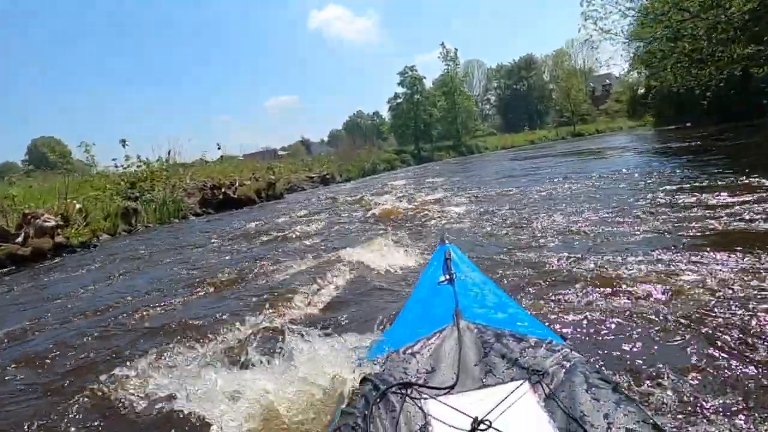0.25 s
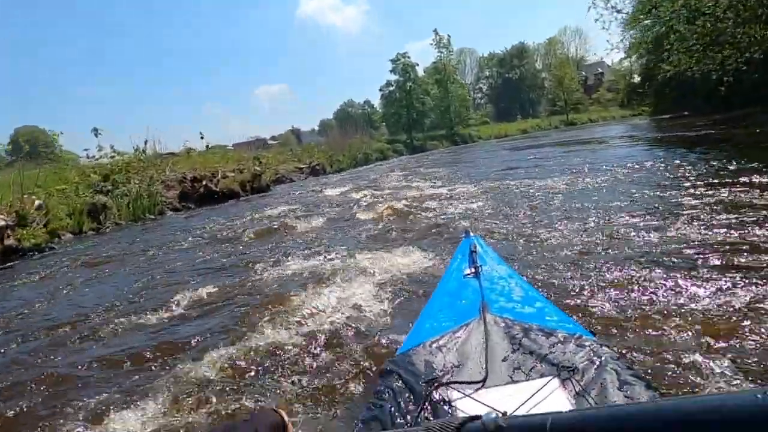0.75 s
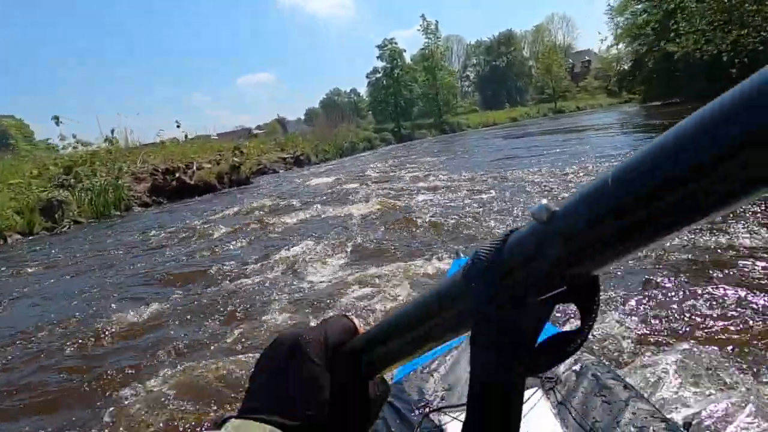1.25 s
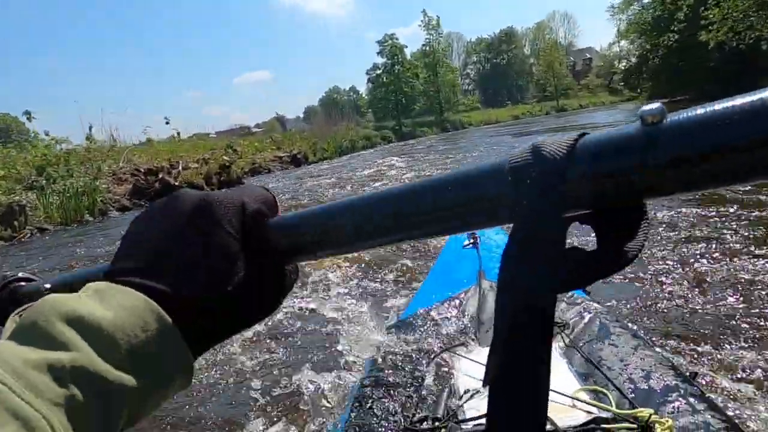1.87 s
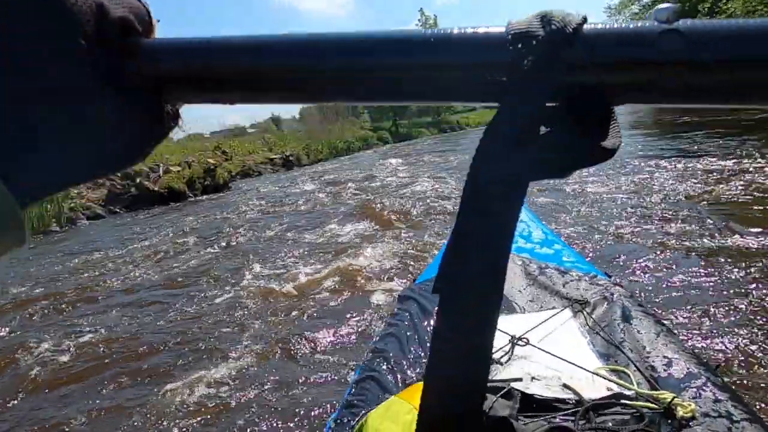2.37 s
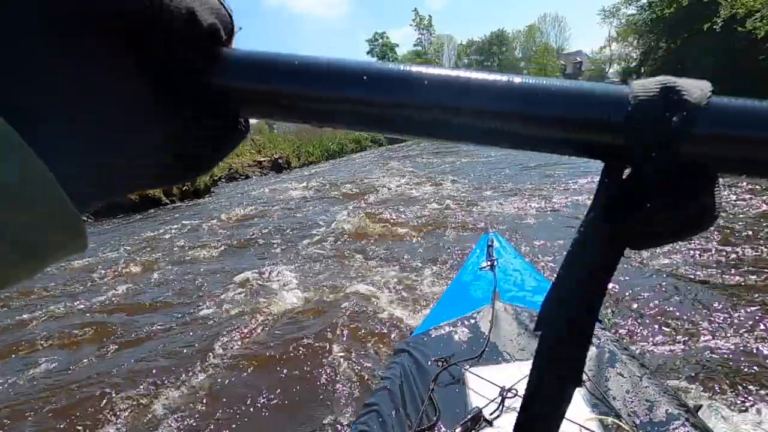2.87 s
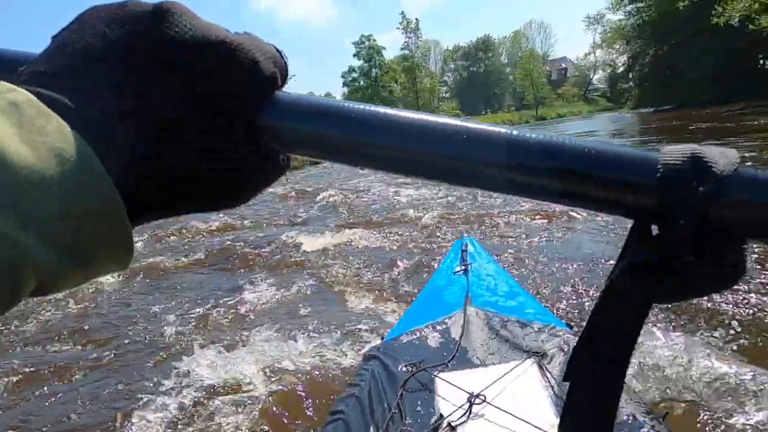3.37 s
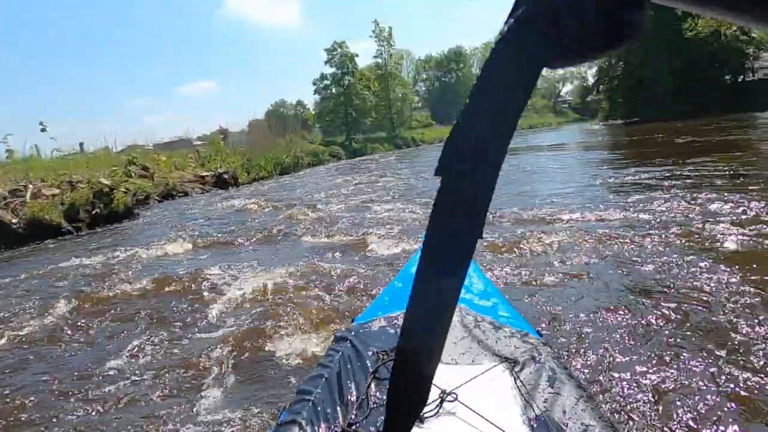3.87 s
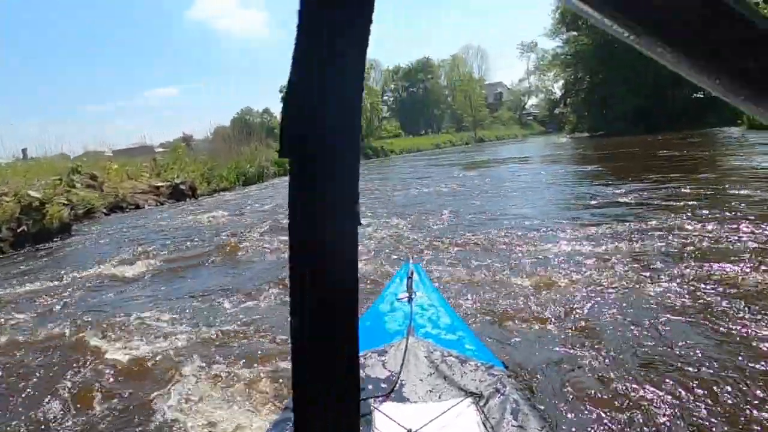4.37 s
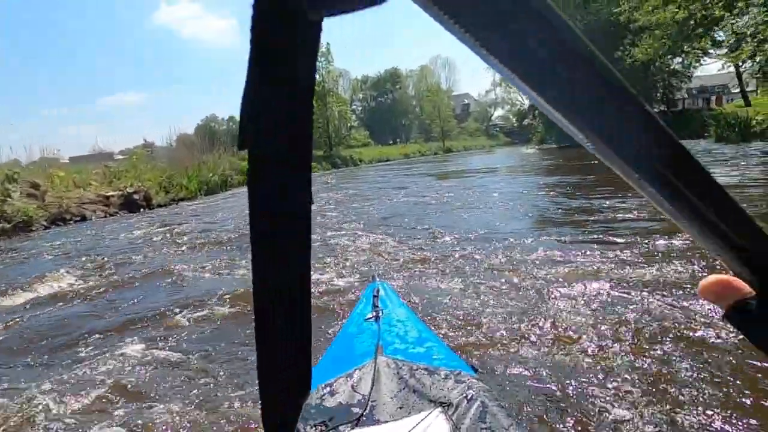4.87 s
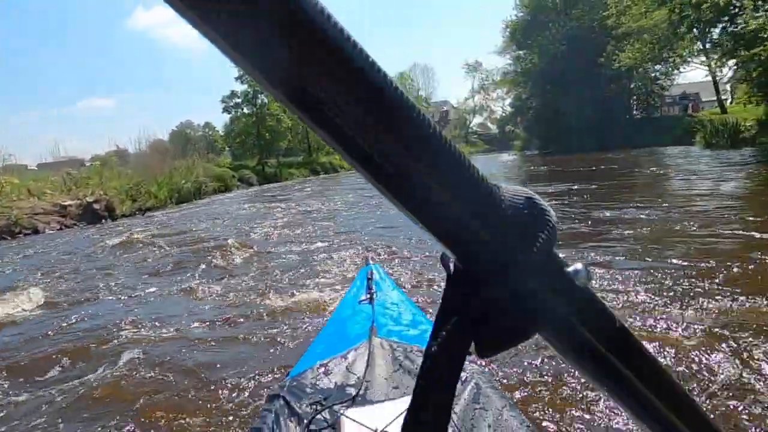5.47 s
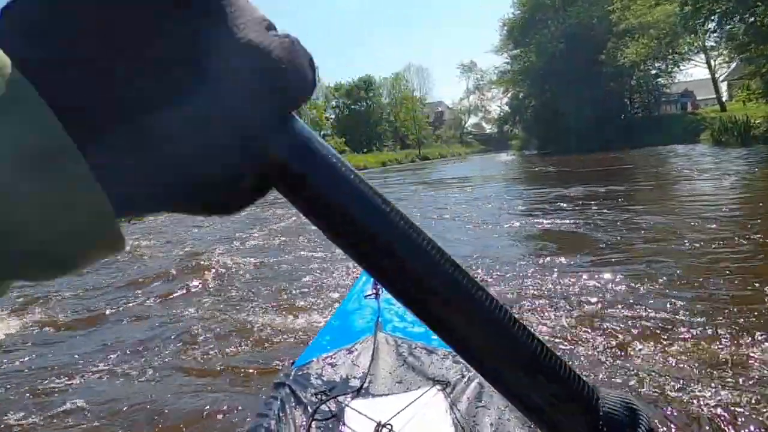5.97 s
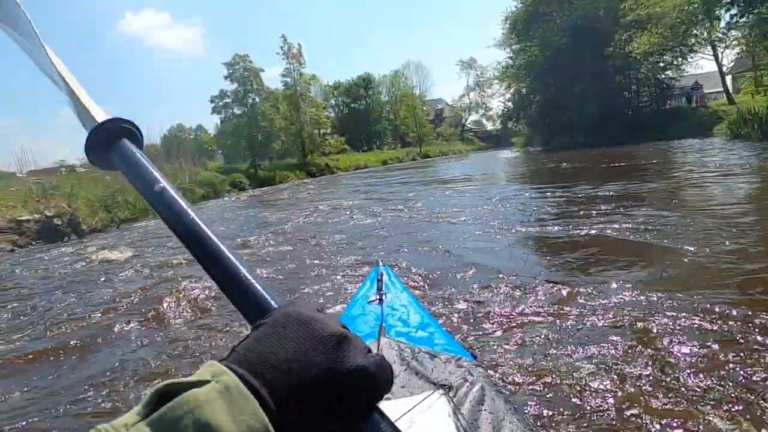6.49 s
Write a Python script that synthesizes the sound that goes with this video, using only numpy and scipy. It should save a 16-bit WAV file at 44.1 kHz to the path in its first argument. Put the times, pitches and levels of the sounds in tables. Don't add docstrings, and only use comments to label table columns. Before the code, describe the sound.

Churning white water surges past a small boat, gulping and slapping underneath, while gusts buffet the enclosed microphone and the rush gradually eases.

```python
import sys
import numpy as np
from scipy import signal
from scipy.io import wavfile
from scipy.ndimage import uniform_filter1d

SR = 44100
rng = np.random.default_rng(int(sys.argv[2]) if len(sys.argv) > 2 else 0)


def dump(signal):
    limited = np.clip(np.atleast_2d(signal).T, -1, 1)
    pcm = np.round(limited * 32767).astype(np.int16)
    wavfile.write(sys.argv[1], SR, pcm)


def volts(x):
    e = np.asarray(x, float) / 20
    return 10 ** e


N = 296793


def evened(x):
    return x / np.sqrt(np.mean(x ** 2) + 1e-20)


def add(mix, start_s, sound):
    part = mix[round(start_s * SR):][:len(sound)]
    part += sound[:len(part)]


def band(x, lo_hz, hi_hz):
    return signal.sosfilt(signal.butter(2, [lo_hz, hi_hz], "band", fs=SR, output="sos"), x)


def crest(t, peak_s, length_s, rise=0.73):
    side_s = length_s * np.where(t < peak_s, rise, 1)
    return np.exp(-((t - peak_s) / side_s) ** 2)


# f/Hz, level/dB (per Hz)
WATER_COLOUR = [(60, -22), (110, -5), (300, 0), (600, -4.5), (1000, -9.5), (1600, -14), (2400, -20.5),
                (3000, -26), (3750, -31), (4450, -31), (5750, -44), (6350, -46), (8600, -63), (11000, -81)]


def rapid(hiss=1.0, patchy_db=0.89, flicker_db=1.02):
    water = foam() + hiss * rng.standard_normal(N) + spray()
    hz, t, z = signal.stft(water, SR, nperseg=512, noverlap=384)
    usual_power = uniform_filter1d(np.mean(abs(z) ** 2, 1), 5)
    z = z / np.sqrt(usual_power)[:, None]
    colour_hz, level_db = np.transpose(WATER_COLOUR)
    colour_db = np.interp(np.log(hz + 1), np.log(colour_hz), level_db)
    patches = uniform_filter1d(rng.standard_normal((len(hz), len(t))), size=8, axis=0)
    patches = evened(uniform_filter1d(patches, size=24, axis=1))
    flicker = evened(uniform_filter1d(rng.standard_normal(len(t)), size=8))
    flicker = flicker * np.clip(hz / 2500, 0, 1)[:, None]
    z = z * volts(colour_db[:, None] + swell(hz, t) + patchy_db * patches + flicker_db * flicker)
    return volts(-25.5) * evened(signal.istft(z, SR, nperseg=512, noverlap=384)[1][:N])


def foam(count=44, crowd=1.1, cycles=6.5, spread_db=2.5):
    out = np.zeros(N)
    for hz in np.geomspace(80, 9000, count):
        bursts = rng.random(N) < crowd * hz / cycles / SR
        sizes = volts(spread_db * np.minimum(rng.exponential(1, N), 4))
        ringing = signal.oaconvolve(sizes * bursts, bubble(hz, cycles, 0.317))[:N]
        out += np.sqrt(hz) * evened(ringing)
    return evened(out)


def bubble(hz, cycles, rise, onset=0.54):
    u = np.arange(int(3 * cycles / hz * SR)) * hz / SR
    ring = np.sin(2 * np.pi * u * (1 + rise * u / cycles / 2))
    return ring * (1 - np.exp(-u / onset)) * np.exp(-2 * u / cycles)


def spray(per_s=27.0, share=0.095):
    clicks = rng.standard_normal(N) * (rng.random(N) < per_s / SR)
    return share * evened(band(clicks, 1500, 12000))


# t/s, nearness of white water/dB, breaking of the waves/dB
COURSE = [(0, -29.5, 1), (.13, -31, 1), (.5, -31, 1), (.84, -29, -0.5), (1.15, -30.5, 1), (1.48, -32, 2.5),
          (1.68, -28, -0.5), (2.2, -31.5, 0.6), (2.9, -33.5, 1), (3.05, -31.5, 0), (3.82, -32.5, 0),
          (4.35, -35.5, -0.5), (4.8, -35.5, 0), (5.3, -37, .5), (5.83, -39, 2), (6.21, -37, -1),
          (6.73, -38.5, 0)]
LAYER_HZ = [400, 1500, 4000, 7000]
FOLLOW_NEAR = [0.67, 1.32, 1.43, 2.2]
FOLLOW_BREAK = [-.6, 0.01, 1.01, 1.2]
# t/s (crest or deepest point), level/dB (change of the
# rush), length/s, f/Hz (centre of the bubbles)
WAVES = [(0.0, 11, 0.0083, 692), (0.455, -4, 0.022, 302), (0.56, 3.5, 0.056, 580), (0.787, 3, 0.094, 597),
         (0.65, 3.5, 0.038, 420), (0.653, 1.5, 0.022, 3510), (.86, 7, 0.025, 4560), (0.955, 3, 0.02, 2800),
         (1.125, 7, 0.013, 5540), (1.457, 4, 0.037, 1500), (1.62, 1.5, 0.068, 3790),
         (1.705, -2, 0.044, 2990), (1.771, -1, 0.03, 706), (2.05, 2, 0.12, 442), (2.16, 3.5, .06, 454),
         (2.377, 5, 0.031, 346), (2.43, 6.5, 0.063, 6400), (2.627, 3, 0.048, 2960), (3.229, 0, 0.036, 401),
         (3.494, 0.5, 0.02, 1565), (3.499, -1.5, 0.022, 6860), (3.626, 2, .08, 1990),
         (3.855, 0.5, 0.15, 1690), (4.68, 3.5, 0.11, 274), (4.864, 3.5, 0.22, 1480), (5.175, 8, 0.041, 295),
         (6.192, 1.5, 0.061, 1515), (6.379, 3.5, 0.05, 452), (6.372, 4.5, 0.034, 5630),
         (6.486, 1.5, .05, 1505),
         (0.21, -1, .1, 3030), (0.468, -3.5, 0.037, 3460), (1.247, 1, 0.17, 768),
           (1.527, -4.5, 0.067, 2180), (1.819, -7, 0.027, 1410), (2.826, -0.5, .08, 2510),
           (2.996, -4.5, 0.066, 258), (3.51, -2.5, 0.13, 760), (6.293, -3, .04, 3520), (2.001, 0, .02, 900),
           (3.354, 0, .05, 298)]


def swell(hz, t, slap_octaves=1.18):
    s, near_db, break_db = np.transpose(COURSE)
    levels_db = np.outer(FOLLOW_NEAR, np.interp(t, s, near_db))
    levels_db += np.outer(FOLLOW_BREAK, np.interp(t, s, break_db))
    place = np.interp(np.log(hz + 1), np.log(LAYER_HZ), np.arange(4))
    shares = np.maximum(1 - abs(place[:, None] - np.arange(4)), 0)
    out = shares @ (levels_db - levels_db.mean(1, keepdims=True))
    dryness = np.interp(t, [1.2, 4.53], [0, 1])
    out += np.outer(np.interp(hz, [4800, 6460], [0, 1]), 17.5 * (dryness - .5))
    for peak_s, db, length_s, mid_hz in WAVES:
        octaves = np.log2((hz + 1) / mid_hz)
        out += db * np.outer(np.exp(-(octaves / slap_octaves) ** 2), crest(t, peak_s, length_s))
    return out


# t/s, level/dB (peak), f/Hz, length/cycles
GULPS = [(.432, -19, 437, 13.4), (.578, -15, 220, 5.4), (0.617, -17.5, 187, 4.3), (0.672, -19.5, 212, 5.5),
         (.94, -17.5, 153, 3.5), (.846, -13.5, 520, 5.4), (0.878, -16, 1480, 3.6), (1.464, -15, 1240, 9.8),
         (1.505, -20, 180, 6.8), (1.6, -18.5, 398, 12.5), (2.208, -16.5, 710, 13), (2.7, -19, 142, 2.4),
         (4.197, -32, 116, 24), (4.512, -19.5, 126, 2), (4.919, -21.5, 408, 6.2), (5.161, -25, 188, 5.9),
         (5.472, -26, 113, 5.2), (5.535, -21, 267, 6), (6.008, -24.5, 76, 6), (5.98, -29, 191, 5.2),
         (6.139, -28, 116, 11), (6.24, -25, 150, 3.7), (6.297, -23.5, 366, 7.2), (6.398, -20, 133, 2.7)]
# t/s, level/dB (peak), f/Hz, length/cycles, rise of pitch/share
SQUEEZES = [
    (0.057, -14, 427, 5.3, -0.075),
    (1.358, -12, 338, 9.2, 0.4),
    (1.501, -7, 332, 1.54, -0.13),
    (1.8154, -8, 317, 1.8, -0.25),
    (1.865, -10.5, 118, 5.7, -0.0065),
    (1.921, -17, 131.4, 6.4, 0.53),
]


def gulps():
    rising = [(s, db, hz, cycles, .17 * (200 / hz) ** 0.72) for s, db, hz, cycles in GULPS]
    out = np.zeros(N)
    for s, db, hz, cycles, rise in SQUEEZES + rising:
        u = np.arange(int(cycles / hz * SR)) * hz / SR
        ring = np.sin(2 * np.pi * u * (1 + rise * u / cycles / 2))
        swelling = np.sin(np.pi * (u / cycles) ** .75)
        add(out, s, -volts(db) * ring * swelling)
    return out


# t/s, level/dB (peak), f/Hz (ring), broad tick/dB (relative to the ring)
DROPS = [(.35, -26.5, 2620, -17), (.696, -29, 2650, -11), (0.855, -30, 4460, 3), (0.879, -35, 4300, 10),
         (.928, -29.5, 3000, 4), (1.1265, -28, 2600, -9), (1.7028, -25, 2820, 2.5), (1.869, -36.5, 4500, 5),
         (2.411, -47, 4470, 3), (2.454, -29, 2680, 2.5), (2.478, -36, 4500, -8), (2.617, -32.5, 2690, 7),
         (3.49, -45.5, 4440, 8), (3.593, -33.5, 2550, -8.5), (3.708, -32.5, 2570, -8),
         (5.2287, -35, 3240, -7), (5.231, -39.5, 4420, -14), (5.244, -35.5, 3110, -6),
         (5.2745, -39.5, 4250, 0), (5.468, -39, 2150, -3.5), (5.571, -38, 3080, -8),
         (6.1747, -33.5, 3530, -13), (6.3772, -34, 2930, -6.5), (6.381, -41, 3280, -5),
         (6.4208, -42, 3040, -11)]
# t/s, level/dB (peak), f/Hz (ring)
FLECKS = [(1.1196, -18.5, 3590), (1.1203, -34, 5370), (1.1198, -48, 6900), (2.411, -43.5, 6300),
          (2.7055, -51, 6500), (3.357, -47.5, 6200), (3.492, -45, 6940), (3.615, -48.5, 6200),
          (3.765, -52, 7400), (3.908, -55, 6200), (4.024, -51.5, 7000), (4.151, -42, 6740),
          (4.861, -32.5, 3400), (4.866, -43.5, 5500), (5.037, -49, 5800), (6.377, -53.5, 7000)]


def drops():
    out, t = np.zeros(N), np.arange(1500) / SR
    rows = [(*row, 0.012, 0.00059) for row in DROPS] + [(*row, -8, 0.0052, .00018) for row in FLECKS]
    snap_and_spatter = volts(-60 * t / 0.011) + .25 * volts(-60 * t / 0.049)
    for s, db, hz, tick_db, t60_s, onset_s in rows:
        ring = np.sin(2 * np.pi * hz * t) * volts(-60 * t / t60_s) * (1 - np.exp(-t / onset_s))
        noise = rng.standard_normal(len(t))
        tick = band(band(noise * snap_and_spatter, 1800, 4600), 1500, 4400)
        add(out, s, volts(db) * (ring / ring.max() + volts(tick_db) * tick / abs(tick).max()))
    return out


# t/s, level/dB
GUSTS = [(0, -23), (.1, -34), (.7, -28.5), (1.0, -30), (1.22, -35), (1.37, -18), (1.45, -29), (1.7, -30),
         (2.0, -24.5), (2.5, -24), (2.98, -23.5), (3.45, -39), (3.7, -26.5), (4.2, -35.5), (4.62, -26),
         (5.1, -37), (6.3, -43), (6.55, -22.5)]
# t/s (crest), level/dB, length/s
FLUTTERS = [(.05, -34.5, 0.066), (.82, -31.5, 0.048), (1.22, -34, 0.055), (1.9, -29, 0.036),
            (1.988, -30, 0.03), (2.08, -22, 0.056), (2.34, -27.5, 0.059), (2.697, -26.5, 0.05),
            (3.75, -36.5, .05), (4.377, -33, 0.042), (5.1, -41, 0.22), (5.55, -49, 0.078),
            (6.152, -38, 0.087), (6.67, -28.5, 0.07)]
# t/s, level/dB (peak), f/Hz (first swing)
PUSHES = [(.194, -21, 30), (.815, -18.5, 50), (0.87, -18, 45), (1.294, -10.5, 90), (1.44, -11, 34),
          (1.51, -20, 47), (2.138, -28, 79), (2.176, -10, 65), (2.498, -9, 150), (2.6842, -8, 83),
          (2.812, -12.5, 83), (3.079, -14, 57), (3.129, -11.5, 89), (3.715, -20, 13), (3.843, -18.5, 24),
          (3.946, -24, 28), (4.659, -20, 30), (6.662, -8.5, 130), (6.693, -16, 62)]
# t/s, level/dB (peak), f/Hz (first swing)
SUCKS = [(0.073, -16, 35), (.106, -13, 35), (1.343, -9.5, 50.3), (1.898, -16, 130), (2.157, -7, 105),
         (2.218, -14, 45), (2.488, -21, 50), (2.671, -13, 45), (3.123, -12, 62), (3.928, -19, 30),
         (4.02, -26, 35), (4.939, -16, 30), (6.711, -13, 70.4)]


def wind(lumpy_db=-4.5, flutter_floor_db=-41):
    t = np.arange(N) / SR
    gust_s, gust_db = np.transpose(GUSTS)
    heave = evened(band(rng.standard_normal(N), 8.3, 48))
    heave = heave * volts(np.interp(t, gust_s, gust_db) - 4.5)
    lumps = volts(lumpy_db * evened(band(rng.standard_normal(N), 1.1, 38)))
    flutter = evened(lumps * band(rng.standard_normal(N), 55, 148))
    bursts = sum(volts(db) * crest(t, peak_s, length_s) for peak_s, db, length_s in FLUTTERS)
    out = heave + flutter * (volts(flutter_floor_db) + bursts)
    for s, db, hz, push in [(*row, 1) for row in PUSHES] + [(*row, -1) for row in SUCKS]:
        u = np.arange(int(4 * SR / hz)) * hz / SR
        swing = np.sin(2 * np.pi * u / (1 + 0.63 * u))
        swing = swing * (1 - np.exp(-u / .08)) * np.exp(-1.6 * u)
        add(out, s, volts(db) * push * swing / swing.max())
    return band(out, 11, 900)


def scene():
    samples = np.arange(N)
    fade = np.minimum(np.minimum(samples / 200, .55 + samples[::-1] / 200), 1)
    return ((rapid() + wind() + gulps() + drops()) * fade)[None]


def band_limit(x):
    return signal.sosfilt(signal.butter(12, 8650, fs=SR, output="sos"), x)


# t/s, f/Hz
TOP_EDGE = [
    (0, 7500),
    (1.5, 7740),
    (1.8, 8240),
    (2.2, 8320),
    (2.9, 8570),
    (6.73, 8930),
]


def record(dry):
    hz, t, z = signal.stft(dry, SR, nperseg=1024)
    over_hz = np.maximum(hz[:, None] - np.interp(t, *np.transpose(TOP_EDGE)), 0)
    cut_db = np.maximum(-.012 * over_hz - .0001 * over_hz ** 2, -80)
    limited = signal.istft(z * volts(cut_db), SR, nperseg=1024)[1][:, :N]
    return band_limit(limited)


dry = scene()
out = record(dry)
dump(out)
```